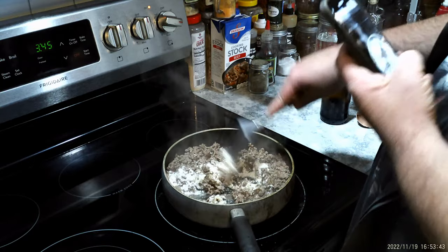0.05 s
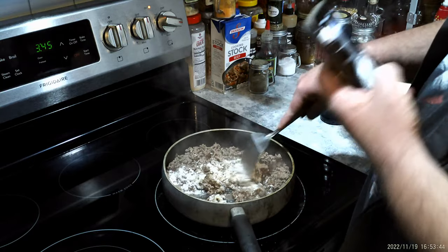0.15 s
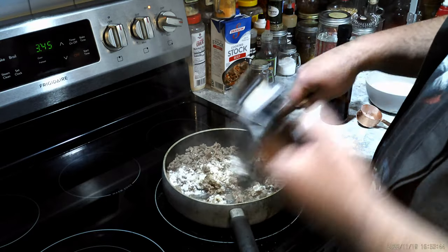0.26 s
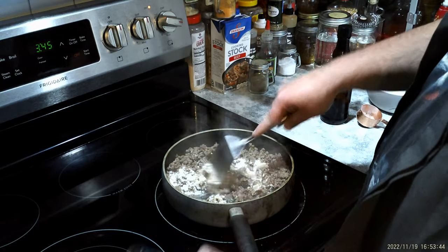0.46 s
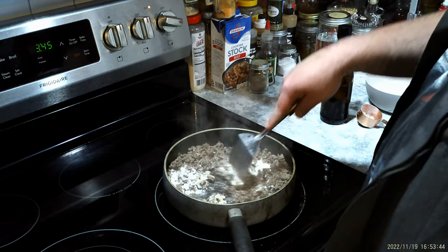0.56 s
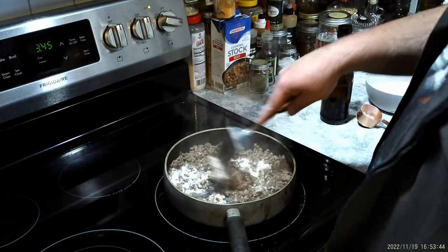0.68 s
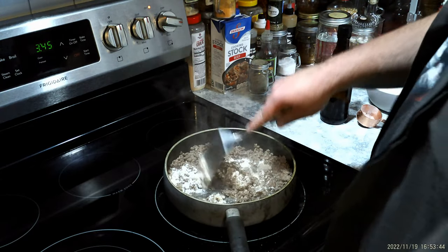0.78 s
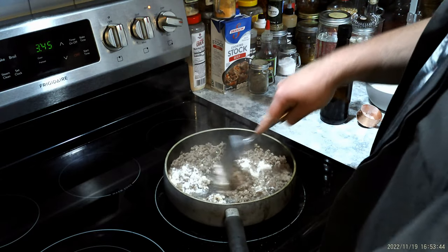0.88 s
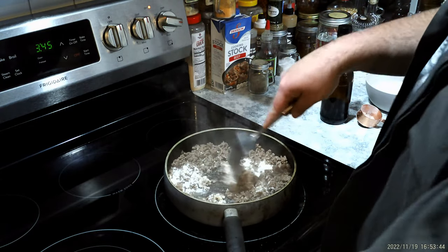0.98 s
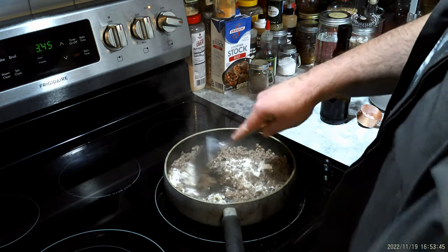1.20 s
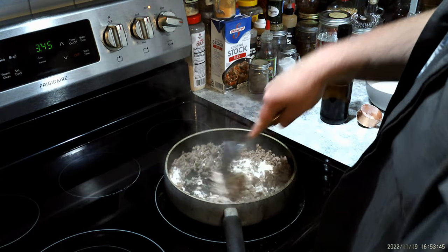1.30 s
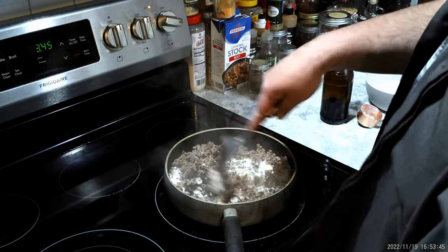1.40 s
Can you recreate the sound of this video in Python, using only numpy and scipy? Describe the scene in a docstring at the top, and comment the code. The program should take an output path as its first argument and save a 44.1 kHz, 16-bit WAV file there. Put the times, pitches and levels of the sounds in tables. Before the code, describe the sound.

Metal spatula clacking against a frying pan, one ringing rim clang, stirring food over faint sizzle

```python
"""In a small kitchen, minced meat sizzles softly in a skillet on a glass cooktop: noise and fat pops.
A metal spatula clangs once on the rim, heard as ringing tones (damped sines) and dense clatter.
Before and after the clang it knocks on the pan floor (clicks and short-lived tones);
it also scrapes in tiny slips and, late on, jabs the wall once. Fading noise gives contacts a short tail.
The pan thuds on the stove with each clang, knock and jab, over a low drone and the rub of pushed food."""
import sys
import numpy as np
from scipy import signal
from scipy.fft import rfft, irfft
from scipy.io import wavfile

SR = 44100
rng = np.random.default_rng(int(sys.argv[2]) if len(sys.argv) > 2 else 0)


def dump_mix(stems):
    """Bounce the given channels to the path in sys.argv[1] as a 16-bit WAV at rate SR."""
    frames = np.atleast_2d(stems).T  # one column per channel
    limited = np.clip(frames, -1, 1)  # hard clip at full scale
    pcm = np.round(limited * 32767).astype(np.int16)
    wavfile.write(sys.argv[1], SR, pcm)


N = 63945  # length of the scene in samples
CUTOFF_HZ = 8700  # top of the microphone's band
RING_S = 0.7  # longest time any ringing is computed
STRIKE_RISE_CYCLES = 1  # build-up of the pan's ringing tones
TREBLE_EDGE_HZ = 4560

# In every table, t60 is the time a sound takes to fade by 60 dB.


def amp(db):
    """Turns decibels into a gain."""
    return 10 ** (np.asarray(db) / 20)


def unit(x):
    """Scales a sound to an average (rms) level of 1."""
    return x / np.sqrt(np.mean(x ** 2) + 1e-20)


def read(points, hz):
    """Reads a table between its points, with pitch on a logarithmic axis."""
    table_hz, value = np.transpose(points)
    return np.interp(np.log(hz + 1), np.log(table_hz), value)


def add(mix, s, sound):
    """Adds a sound into the mix at its time, cutting what runs past the end."""
    part = mix[max(round(s * SR), 0):][:len(sound)]
    part += sound[:len(part)]


def at(s, sound):
    """Places a sound at its time in silence."""
    out = np.zeros(N)
    add(out, s, sound)
    return out


def click(points, size=4096):
    """Makes a click of energy 1 with the given spectrum and nothing before its start."""
    hz = np.abs(np.fft.fftfreq(size, 1 / SR))
    log_gain = np.log(amp(read(points, hz)))
    # The Hilbert transform finds the phase that packs the click at its start.
    spectrum = np.exp(np.conj(signal.hilbert(log_gain)))
    pulse = np.fft.ifft(spectrum).real[:size // 2]
    return pulse / np.linalg.norm(pulse)


def colour(x, points):
    """Filters a sound with the spectrum in a table."""
    return signal.fftconvolve(x, click(points))[:len(x)]


def treble(x, db, edge_hz=TREBLE_EDGE_HZ, order=10):
    """Dulls or brightens a sound above an edge by changing only its upper part."""
    edge = min(edge_hz, CUTOFF_HZ)
    lowpass = signal.butter(order, edge, fs=SR, output="sos")
    low = signal.sosfiltfilt(lowpass, x, padtype=None)
    return low + amp(db) * (x - low)


def dense(points, t60s, count=10):
    """Imitates countless overlapping tones and echoes by noise whose bands die at their own speeds."""
    t = np.arange(0, RING_S, 1 / SR)
    noise = rfft(rng.choice([-1., 1.], len(t)))
    hz = np.fft.rfftfreq(len(t), 1 / SR)
    centres = np.geomspace(100, CUTOFF_HZ, count)
    total = np.zeros(len(t))
    for centre, weights in zip(centres, np.eye(count)):
        band = irfft(noise * np.interp(hz, centres, weights), len(t))
        t60 = read(t60s, centre) if np.ndim(t60s) else t60s
        total += band * np.exp(-np.log(1000) * t / t60)
    return colour(total, points)


def modes(rows, rise_cycles, flip=-1):
    """Sums damped sines that build up over some cycles; flip=-1 makes neighbours start oppositely."""
    t = np.arange(0, RING_S, 1 / SR)
    total = np.zeros(len(t))
    for k, (hz, db, t60) in enumerate(rows):
        decay = np.exp(-np.log(1000) * t / t60)
        rise = 1 - np.exp(-hz * t / rise_cycles)
        total += np.sign(flip) ** k * amp(db) * decay * rise * np.sin(2 * np.pi * hz * t)
    return total


def grains(n, rate, spread_db):
    """Scatters tiny impulses of uneven size at random, scaled to rms 1."""
    happens = rng.random(n) < rate / SR
    sign = rng.choice([-1., 1.], n)
    size = amp(spread_db * np.minimum(rng.exponential(1, n), 4))
    return unit(happens * sign * size)


# Ringing tones of the skillet, with relative levels:
# (pitch [Hz], level at the strike [dB], level of the after-ring [dB], after-ring t60 [s])
PAN_TONES = [(563, -44, -36, 0.38), (846, -19, -29.5, .3), (892, -18, -23.5, .33), (973, -17.5, -31.5, .33),
             (1054, -17, -45, 0.1), (1208, -25, -31, .27), (1369, -22, -34, 0.28), (1552, -12.5, -31, 0.29),
             (1720, -16, -30, 0.18), (1847, -17, -29, .33), (1780, -46.5, -38, 0.44),
             (2010, -15, -35, 0.092), (2880, -16.5, -48.5, .25), (4030, -18, -37, 0.22),
             (4220, -19, -34, 0.41), (5960, -35, -31.5, 0.19), (6140, -42.5, -33, 0.25)]


def pan_strike():
    """The skillet's tones at the blow, all dying quickly together."""
    strike_t60_s = 0.04
    rows = [(hz, db, strike_t60_s) for hz, db, _, _ in PAN_TONES]
    return modes(rows, STRIKE_RISE_CYCLES)


def pan_ring():
    """The skillet's lasting ring, each tone dying at its own speed."""
    rows = [(hz, db, t60) for hz, _, db, t60 in PAN_TONES]
    return modes(rows, STRIKE_RISE_CYCLES)


# Blade chattering on the rim, with the blade's own bending tone (its flex):
# (time [s], clash level [dB], flex pitch [Hz], flex level [dB], treble [dB])
CHATTER = [(0.2144, -11.5, 976, 0.5, -25), (0.2191, -12.5, 1660, -1.5, 2), (0.2235, -17, 1715, -24, 0)]
# Colour of the rim's dense ringing: (pitch [Hz], relative level [dB])
RIM_COLOUR = [(40, -13.5), (140, -6.5), (350, -14.5), (520, -8.5), (660, -18), (900, -1), (1350, -6),
              (1750, -0.5), (2450, -11.5), (3000, -5), (3600, -11), (4200, -7), (4700, -9), (6200, -12.5),
              (7500, -20.5), (9000, -51.5)]
# How long the clang's tail lasts: (pitch [Hz], t60 [s])
RIM_T60 = [(100, 0.22), (900, 0.22), (2000, 0.41), (4500, 0.3), (8000, 0.38)]
CLANG_S, CLANG_DB, CLANG_THUD_DB = 0.2143, -0.5, -4
RIM_TAIL_DB, TAIL_RISE_S = -19.5, 0.0034
CHATTER_T60_S, FLEX_T60_S = 0.032, 0.014


def clang():
    """The blade hits the rim, chatters for a moment and leaves the pan's tones ringing."""
    tones = amp(CLANG_DB) * (pan_strike() + pan_ring())
    tail = amp(RIM_TAIL_DB) * dense(RIM_COLOUR, RIM_T60)
    tail *= 1 - np.exp(-np.arange(len(tail)) / SR / TAIL_RISE_S)
    out = at(CLANG_S, tones + tail + amp(CLANG_THUD_DB) * thud())
    for s, db, flex_hz, flex_db, treble_db in CHATTER:
        clash = amp(db) * dense(RIM_COLOUR, CHATTER_T60_S)
        flex = modes([(flex_hz, flex_db, FLEX_T60_S)], STRIKE_RISE_CYCLES)
        out += treble(at(s, clash - flex), treble_db)  # the flex starts downwards
    return out


# Blade knocks on the pan floor; thud and pan ring are relative to the knock level:
# (time [s], level [dB], thud [dB], treble [dB], pan ring [dB], rebound delay [s], hardness [dB])
KNOCKS = [(0.0, -18.5, 6, -1.5, -13, 0.0073, -4.5), (0.057, -19.5, 1, -2.5, -23, .004, -2.5),
          (0.3227, -7, 0, 6.5, -17.5, 0.0052, 0.5), (0.4120, -10.5, 3, 3.5, -21.5, 0.0082, -2.5),
          (0.4910, -13.5, -0.5, -1.5, -13.5, 0.0051, -6.5), (0.6741, 2, 2, -31, -20.5, 0.0099, 0),
          (0.9607, -13.5, 0, -4, -32.5, 0.006, -7), (1.0290, 0, 2, -17, -25, .0092, 0),
          (1.0943, -13, 0, 3, -19, 0.0041, 0.5), (1.1870, -21.5, 5, -1, -14, 0.009, -3),
          (1.336, -12.5, 0, -17, -21, 0.0051, -8)]
# The pan floor's tones, damped by the food: (pitch [Hz], relative level [dB], t60 [s])
FLOOR_TONES = [(553, -43, 0.21), (814, -30.5, 0.074), (824, -31.5, 0.049), (880, -12.5, 0.019),
               (1290, -36.5, 0.12), (1564, -35.5, .08), (1843, -46.5, 0.043), (2794, -29, .025),
               (3185, -11, 0.005)]
# Change of those tones at the softer second contact: (pitch [Hz], change [dB])
SOFT_CHANGE = [(100, 7), (1000, -0.5), (2000, -9), (3200, -5.5), (9000, -14)]
# Colour of the blade's tick: (pitch [Hz], relative level [dB])
TICK_COLOUR = [(60, -27.5), (300, -20), (600, -8.5), (900, -5.5), (1400, 5), (2200, -0.5), (3100, -4.5),
               (3700, -1.5), (4400, -10.5), (6500, -5.5), (9000, -27)]
# Colour of the pan's dull answer: (pitch [Hz], relative level [dB])
BODY_COLOUR = [(40, -16), (170, -1), (350, -1.5), (650, -2.5), (880, 1), (1150, -4), (2200, -7),
               (3100, -8.5), (4200, -6.5), (6500, -16), (9000, -44)]
# How long the tail of a contact lasts: (pitch [Hz], t60 [s])
KNOCK_T60 = [(100, 0.89), (400, 0.35), (1000, 0.23), (3000, .27), (8000, 0.41)]
TICK_DB, BODY_DB, TAIL_DB = -10, -26, -34.5  # relative to the knock level
REBOUND_DB, REBOUND_SHARE = -32, 0.65  # dull answer; gain of the floor tones
BODY_T60_S, FLOOR_RISE_CYCLES = 0.048, 2.16
HARD_ABOVE_HZ = 1300  # hardness acts above this pitch


def knocks():
    """Each knock is a tick and the pan's food-damped answer; then a softer rebound and a stove thud."""
    out = np.zeros(N)
    floor, bump, ring = modes(FLOOR_TONES, FLOOR_RISE_CYCLES), thud(), pan_ring()
    soft_rows = [(hz, db + read(SOFT_CHANGE, hz), t60) for hz, db, t60 in FLOOR_TONES]
    soft_floor = REBOUND_SHARE * modes(soft_rows, FLOOR_RISE_CYCLES)
    for s, db, thud_db, treble_db, ring_db, rebound_s, hard_db in KNOCKS:
        body = amp(BODY_DB) * dense(BODY_COLOUR, BODY_T60_S)
        tail = amp(TAIL_DB) * dense(BODY_COLOUR, KNOCK_T60)
        hit = floor + body + amp(ring_db) * ring + tail
        add(hit, 0, amp(TICK_DB) * click(TICK_COLOUR))
        soft_body = amp(REBOUND_DB) * dense(BODY_COLOUR, BODY_T60_S)
        add(hit, rebound_s, soft_body + soft_floor + amp(thud_db) * bump)
        knock = treble(at(s, amp(db) * hit), hard_db, HARD_ABOVE_HZ, order=2)
        out += treble(knock, treble_db)
    return out


# Colour of the jab on the pan wall: (pitch [Hz], relative level [dB])
JAB_COLOUR = [(40, -36), (140, 3.5), (230, -15.5), (340, 5), (600, -0.5), (900, 0.5), (1200, -13.5),
              (1650, 4), (2050, -18.5), (2400, -4.5), (3400, -12), (4300, 0.5), (4800, -30.5), (9000, -68)]
JAB_S = 1.3697
JAB_DB, JAB_RING_DB, JAB_TAIL_DB, JAB_THUD_DB = -2, -24.5, -35.5, -3.5


def jab():
    """A single dry, hollow clack on the pan wall: a click, short dense ringing, a tail and a thud."""
    ringing = amp(JAB_RING_DB) * dense(JAB_COLOUR, BODY_T60_S)
    tail = amp(JAB_TAIL_DB) * dense(JAB_COLOUR, KNOCK_T60)
    answer = ringing + tail + amp(JAB_THUD_DB) * thud()
    add(answer, 0, amp(JAB_DB) * click(JAB_COLOUR))
    return at(JAB_S, answer)


# Scrapes along the pan: (start [s], length [s], level before colouring [dB], treble [dB])
SCRAPES = [(0.41, 0.026, -47, -4), (1.049, 0.052, -46.5, 2.5), (1.347, 0.018, -46.5, -25),
           (1.392, 0.034, -37.5, -40)]
# Colour of the scraping metal: (pitch [Hz], relative level [dB])
SCRAPE_COLOUR = [(60, -14.5), (300, -1.5), (900, -2), (1150, -1), (1700, -2.5), (2100, -2), (3000, -5.5),
                 (4200, -5.5), (6200, -4.5), (7500, -12.5), (9000, -40.5)]
SLIPS_PER_S, SLIP_SPREAD_DB = 1000, 3.5
SCRAPE_ROOM_DB = -7  # tail relative to the scrapes


def scrapes():
    """The blade edge sticks and slips along the metal, each slip a tiny impulse, with a short tail."""
    out = np.zeros(N)
    for s, length, db, treble_db in SCRAPES:
        n = int(length * SR)
        swell = np.sin(np.pi * (np.arange(n) / n) ** 0.49)  # rises early, then fades
        stroke = amp(db) * grains(n, SLIPS_PER_S, SLIP_SPREAD_DB) * swell
        out += treble(at(s, stroke), treble_db)
    out = colour(out, SCRAPE_COLOUR)
    tail = dense(SCRAPE_COLOUR, KNOCK_T60)
    echo = signal.fftconvolve(out, tail / np.linalg.norm(tail))[:N]
    return out + amp(SCRAPE_ROOM_DB) * echo


# Tones of the pan bumping the stove: (pitch [Hz], relative level [dB], t60 [s])
THUD_TONES = [(81, -42, 0.12), (146.2, -46, .25), (176, -23, .05), (210, -44, 0.099), (333.7, -44.5, 0.23)]


def thud():
    """The skillet bumps the stove top: low damped tones that all start in the same direction."""
    return modes(THUD_TONES, rise_cycles=0.53, flip=1)


# How strongly the food is shoved across the pan: (time [s], level [dB])
SHOVE_LEVEL = [(0, -45.5), (0.16, -67), (0.359, -44), (0.6, -66), (0.78, -53.5), (0.9, -64), (1.0, -59),
               (1.14, -47.5), (1.3, -62.5), (1.45, -51)]
# Dull colour of the rubbing food: (pitch [Hz], relative level [dB])
MUSH_COLOUR = [(30, -21.5), (70, -5.5), (200, -4.5), (380, -5.5), (600, -13), (900, -15), (1400, -28.5),
               (5000, -54.5)]


def food():
    """The meat rubs softly as the blade pushes it: dull noise that swells and sinks."""
    rubbing = unit(colour(rng.standard_normal(N), MUSH_COLOUR))
    return rubbing * amp(np.interp(np.arange(N) / SR, *np.transpose(SHOVE_LEVEL)))


# Colour of the sizzle and kitchen rumble together: (pitch [Hz], relative level [dB])
SIZZLE_COLOUR = [(15, -20.5), (25, 2), (88, -5.5), (154, -5.5), (292, -15.5), (539, -13), (707, -15),
                 (860, -10.5), (1070, -17.5), (1670, -17.5), (2800, -18), (3010, -18.5), (5300, -19.5),
                 (6780, -24.5), (8880, -46.5), (11500, -57.5), (19500, -120)]
# Colour of each fat pop: (pitch [Hz], relative level [dB])
POP_COLOUR = [(100, -18), (1000, 3), (3000, -3.5), (6000, 0), (9000, -31.5)]
SIZZLE_DB, POPS_DB, POPS_PER_S = -52, -64.5, 1200  # pops level is before colouring


def frying():
    """Steady sizzle and kitchen rumble as one coloured noise, with tiny random pops of fat."""
    hiss = amp(SIZZLE_DB) * unit(colour(rng.standard_normal(N), SIZZLE_COLOUR))
    pops = colour(grains(N, POPS_PER_S, spread_db=9.0), POP_COLOUR)
    return hiss + amp(POPS_DB) * pops


# The stove top's drone as the pan is pushed about: (time [s], level [dB])
DRONE_LEVEL = [(0, -60), (0.402, -52.5), (0.621, -65.5), (0.9, -62), (1.1, -45), (1.25, -53), (1.45, -72)]
DRONE_HZ, DRONE_WIDTH_HZ = 145, 17.3  # the width is from the centre to half amplitude


def drone():
    """The stove top resonates under the moving pan: a narrow band of low noise."""
    hz = np.fft.rfftfreq(N, 1 / SR)
    phase = np.exp(2j * np.pi * rng.random(len(hz)))
    band = phase / (1 + ((hz - DRONE_HZ) / DRONE_WIDTH_HZ) ** 2)
    level = amp(np.interp(np.arange(N) / SR, *np.transpose(DRONE_LEVEL)))
    return unit(irfft(band, N)) * level


def scene():
    """Adds all the sounds together at one microphone."""
    return (clang() + knocks() + jab() + scrapes() + food() + frying() + drone())[None]


OVERLOAD = 1  # level at which the microphone saturates


def record(dry):
    """A small microphone rounds off the loudest peaks and passes only a narrow band."""
    rounded = OVERLOAD * np.tanh(dry / OVERLOAD)
    lowpass = signal.firwin(301, CUTOFF_HZ, window=("kaiser", 8), fs=SR)
    return signal.oaconvolve(rounded, lowpass[None], "same")


dry = scene()
out = record(dry)
dump_mix(out)
```